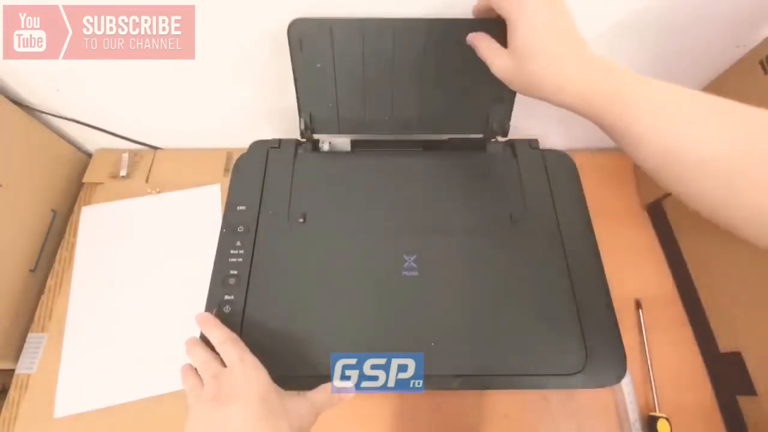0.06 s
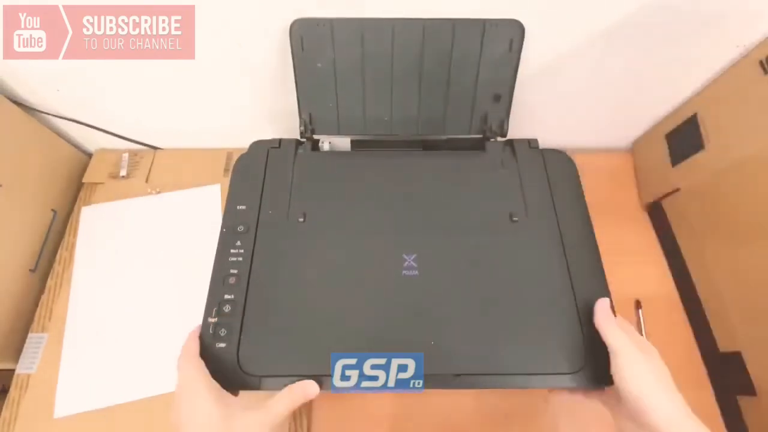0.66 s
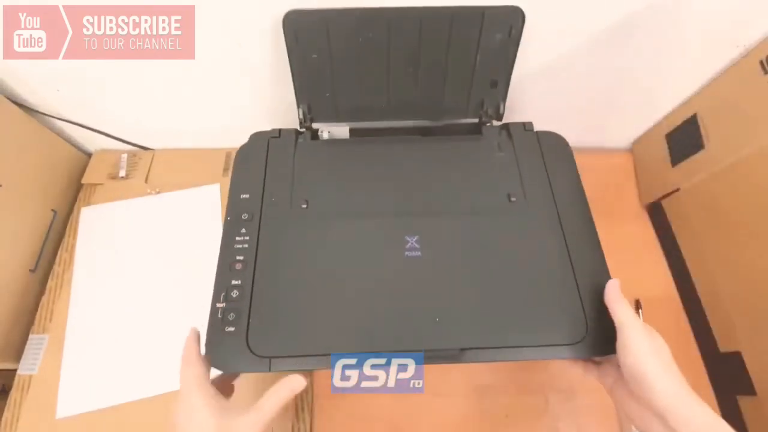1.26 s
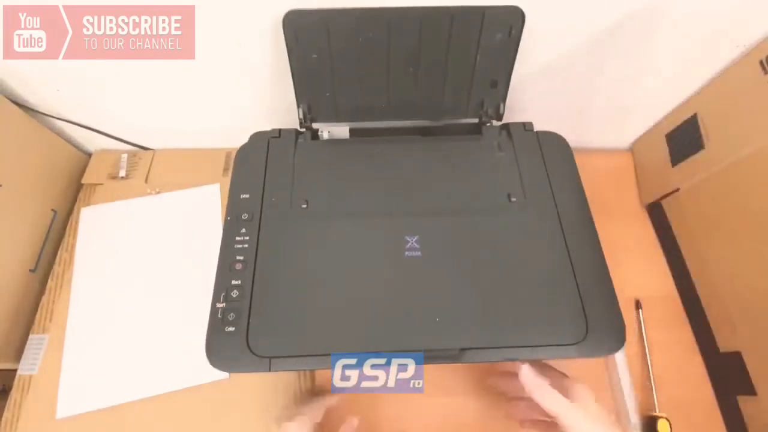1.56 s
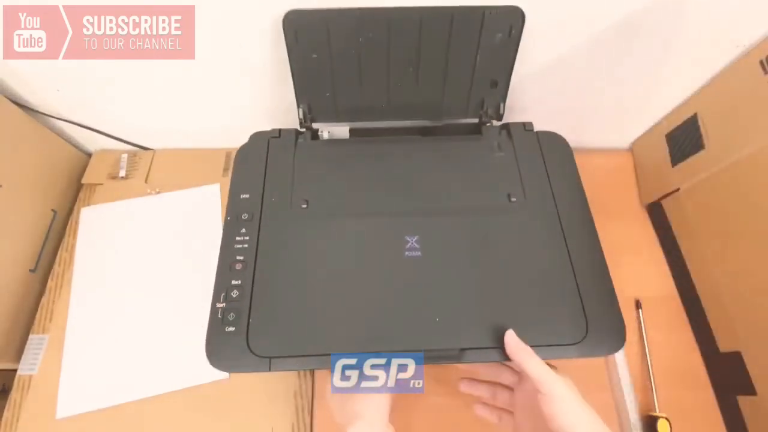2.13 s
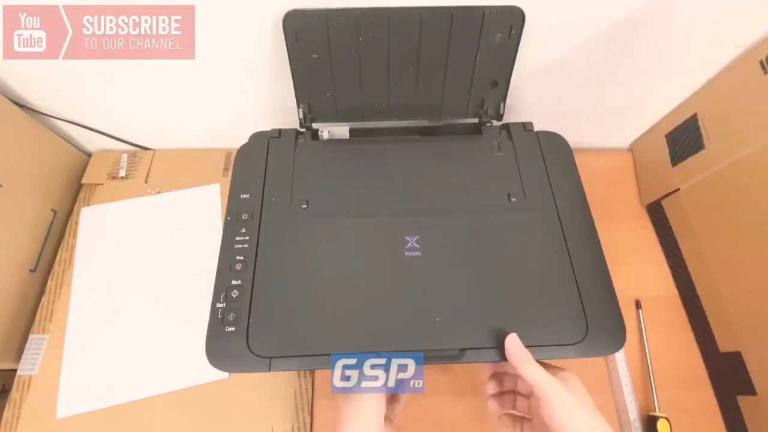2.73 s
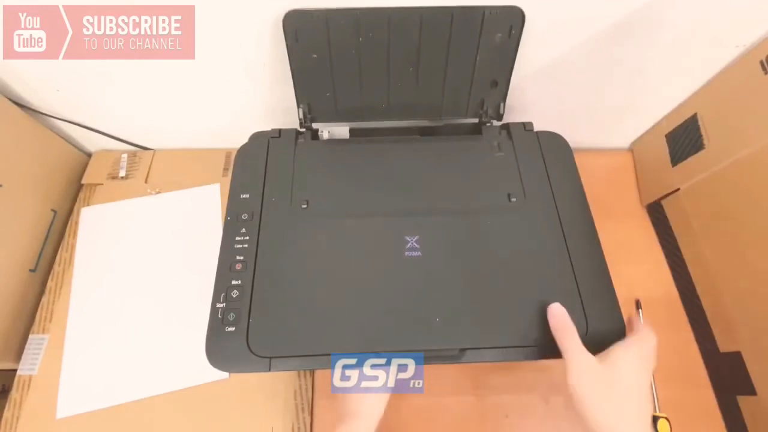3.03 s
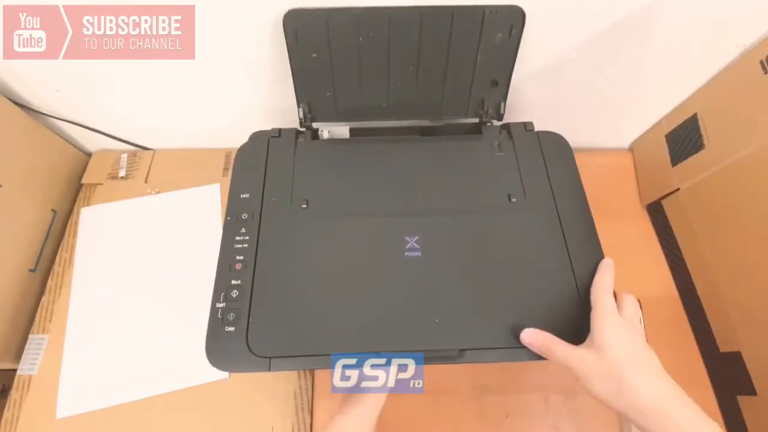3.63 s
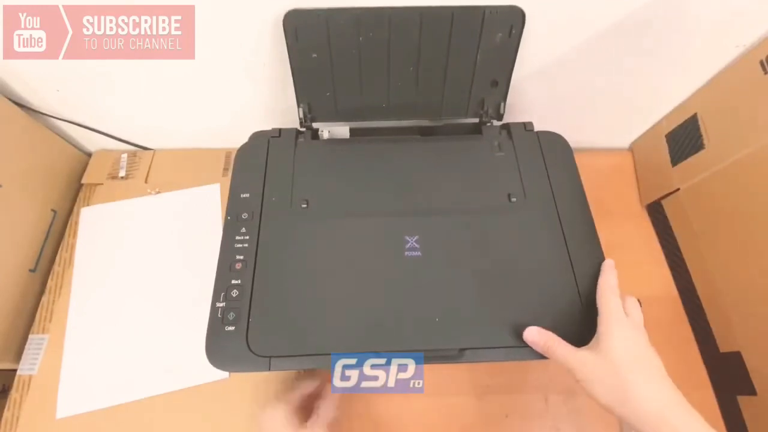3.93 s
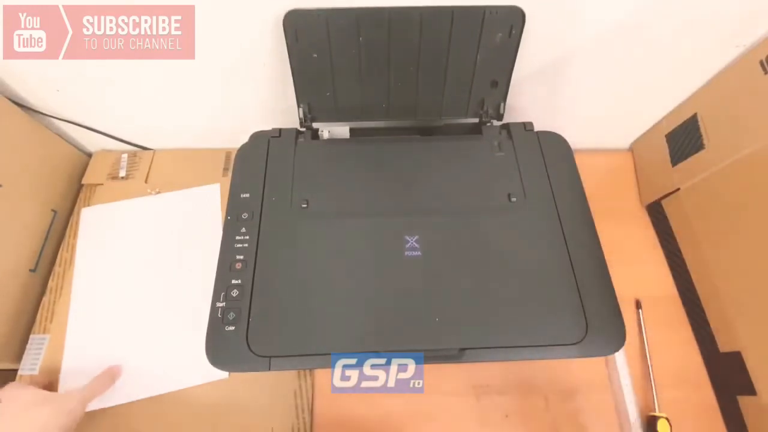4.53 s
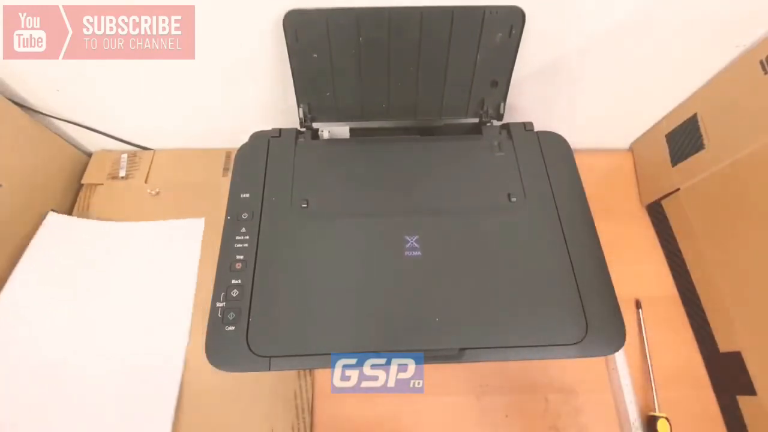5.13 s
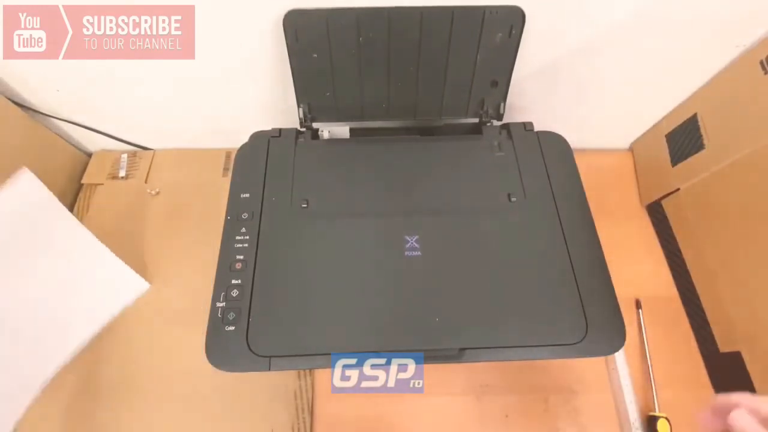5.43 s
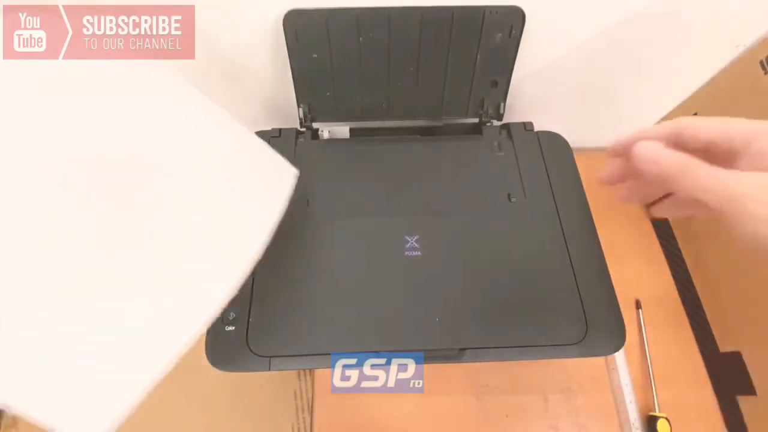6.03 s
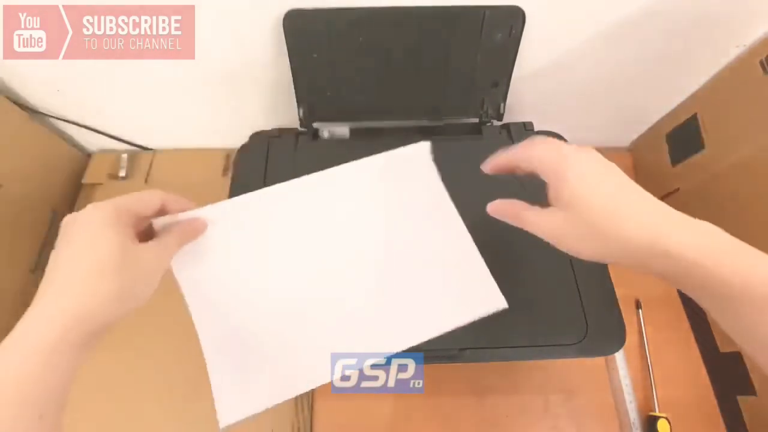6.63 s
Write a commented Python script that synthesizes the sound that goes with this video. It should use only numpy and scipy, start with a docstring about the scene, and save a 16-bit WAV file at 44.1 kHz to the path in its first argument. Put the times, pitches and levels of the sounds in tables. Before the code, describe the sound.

A plastic cover is worked onto a printer with clicks and one loud snap, then paper slides and crinkles in a quietly humming room.

```python
"""A desktop printer's plastic cover is pressed back into place by two hands: the raised rear tray
rattles, the cover scrapes and squeaks, catches tick, then it snaps home and the case thumps on the desk.
Blows are damped modes plus noise bursts; scrapes are tiny random slips. A sheet of paper slides off a
carton and swings over the printer, hissing, buckling and bending. A small room hums low behind it all."""
import sys
import numpy as np
from scipy import signal
from scipy.fft import rfft, irfft
from scipy.io import wavfile
from scipy.ndimage import uniform_filter1d

SR = 44100
rng = np.random.default_rng(int(sys.argv[2]) if len(sys.argv) > 2 else 0)


def output_pcm(signal):
    """Save a mono or channel-first signal as 16-bit PCM at the path in sys.argv[1].

    Samples are clipped to [-1, 1] before scaling.
    """
    pcm = np.clip(np.atleast_2d(signal).T, -1, 1) * 32767
    wavfile.write(sys.argv[1], SR, np.round(pcm).astype(np.int16))


N = 299439
T = np.arange(N) / SR
RING_T = T[:SR // 2]  # time axis of one blow
RING_N = len(RING_T)
SIDE_LAG_S = 0.00027  # extra travel to the far side

# spectrum of bending paper: (frequency [Hz], density [dB])
SHEET_FLEX = [(300, 2), (600, 4), (1000, 9), (1700, -0.5), (2600, -9), (5000, -49)]


def undb(db):
    """Decibels to gain."""
    return 10 ** (np.asarray(db) / 20)


def unit(x):
    """Scale to rms 1."""
    return x / np.sqrt(np.mean(x ** 2))


def add(out, time_s, sound):
    """Mix a sound in at time_s."""
    start = max(0, int(time_s * SR))
    part = sound[..., :N - start]
    out[:, start:start + part.shape[-1]] += part


def colour(x, points):
    """Filter by (frequency [Hz], gain [dB]) points."""
    hz, db = np.transpose(points)
    size = x.shape[-1]
    bins_hz = np.maximum(np.fft.rfftfreq(size, 1 / SR), 1)
    gain = undb(np.interp(np.log(bins_hz), np.log(np.maximum(hz, 1)), db))
    return irfft(rfft(x) * gain, size)


def spread(pair):
    """Two unrelated signals to stereo; long waves reach both sides alike."""
    # stereo width: (frequency [Hz], side re mid [dB])
    width = [(50, -23), (120, -6), (380, -7.5), (700, 2), (1500, 1), (16000, -0.5)]
    side = colour(pair[1], width)
    return np.array([pair[0] + side, pair[0] - side])


def from_right(x):
    """Direct sound from the right reaches the left later."""
    lag = round(SIDE_LAG_S * SR)
    return np.array([np.pad(x, (lag, 0))[:len(x)], x])


def placed(pair, bearing, direct_db, scatter_db):
    """Direct sound, near side first (bearing -1 left to 1 right), plus scatter off the cartons."""
    mid, side = (pair[0] + pair[1]) / 2, (pair[0] - pair[1]) / 2
    lag = round(min(abs(bearing), 1) * SIDE_LAG_S * SR)
    late = np.pad(mid, (lag, 0))[:len(mid)]
    direct = np.array([late, mid] if bearing > 0 else [mid, late])
    scattered = np.array([side, np.roll(side, round(0.004 * SR))])
    return undb(direct_db) * direct + undb(scatter_db) * scattered


def pan(pair, left_db):
    """Raise left over right by left_db."""
    return pair * undb(np.array([[1], [-1]]) * left_db / 2)


def noise(points, size=RING_N):
    """Coloured stereo noise, rms 1."""
    return unit(colour(spread(rng.standard_normal((2, size))), points))


def onset(rise_s):
    """A blow takes a moment to spread through the material."""
    return 1 - np.exp(-RING_T / max(rise_s, 1e-4))


def fade(t60_s):
    """Exponential decay."""
    return np.exp(-np.log(1000) * RING_T / max(t60_s, 1e-3))


def stroke(time_s, attack_s, hold_s, release_s, depth_db=20):
    """Gain that climbs depth_db over the attack, holds, and drops as far over the release."""
    full_s = time_s + attack_s
    before = (full_s - T) / max(attack_s, 1e-3)
    after = (T - full_s - hold_s) / max(release_s, 1e-3)
    return undb(-depth_db * np.maximum(before, after).clip(0, 10))


def arch(time_s, length_s):
    """Half-sine gain."""
    return np.sin(np.pi * ((T - time_s) / length_s).clip(0, 1))


def ring(modes, t60_s):
    """Struck modes, varied per blow; neighbours swing in opposition, those above 400 Hz die sooner."""
    out = 0
    for k, (hz, db) in enumerate(modes):
        jitter_db, detune, lag = rng.standard_normal(3)
        phase = 2 * np.pi * hz * (1 + 0.003 * detune) * RING_T
        decay = fade(t60_s * min(1, 400 / hz) ** 0.25)
        skew = np.array([[1], [-1]]) * np.tanh(lag) * min(hz / 1500, 1)  # short waves arrive out of step
        out = out + (-1) ** k * undb(db + jitter_db) * decay * np.sin(phase + skew)
    return out / np.sqrt(np.sum(undb(np.array(modes)[:, 1]) ** 2))


def friction(points, grain_db, smooth):
    """Tiny uneven slips, 1500 a second, each a noise burst, over a smooth hiss."""
    slips = (rng.random(N) < 1500 / SR) * undb(grain_db * rng.exponential(size=N).clip(0, 5))
    power = signal.lfilter([1], [1, -np.exp(-1 / (0.0053 * SR))], slips ** 2)
    envelope = np.sqrt(power / power.mean() + smooth ** 2)
    return unit(colour(spread(rng.standard_normal((2, N))) * envelope, points))


def background(air_db=-42, hum_db=-1):
    """Room noise and narrow humming resonances."""
    # room noise: (frequency [Hz], density [dB])
    air_spectrum = [(15, -26), (25, -29), (66, 4.5), (242, -12.5), (384, -2), (503, -18), (641, -14),
                    (840, -20), (1040, -18.5), (1330, -28), (1440, -25.5), (4030, -35.5), (11300, -41.5),
                    (13200, -55), (16000, -61)]
    # hum bands: (centre [Hz], width [Hz], level [dB])
    bands = [(46.2, 22, -46.5), (74, 9.2, -56), (102.3, 2.3, -53.5), (141.6, 27.6, -49), (173.9, 5.3, -55),
             (205.8, 1.64, -54.5), (238.2, 5.3, -59), (288.6, 27, -57), (390, 106, -60.5), (924, 16, -68.5),
             (1031, 11, -70)]
    air = undb(air_db) * noise(air_spectrum, N)
    bins_hz = np.fft.rfftfreq(N, 1 / SR)
    peaks = sum(undb(db) * np.exp(-2 * ((bins_hz - hz) / width_hz) ** 2) / np.sqrt(width_hz)
                for hz, width_hz, db in bands)
    white = spread(rng.standard_normal((2, N)))
    return air + undb(hum_db) * np.sqrt(SR / 2) * irfft(rfft(white) * peaks, N)


def drones(gain_db=-1):
    """Low gliding tones swell and fade, like engines far outside."""
    # swells: (time [s], level [dB], attack [s], hold [s], release [s], pitch after attack [Hz],
    # glide [Hz/s])
    swells = [(0, -37.5, 0.018, 0.5, 0.91, 57.6, 1.5), (1.01, -43, 0.33, 0.27, 0.2, 49, -4),
              (2.702, -42.5, 0.46, 0.13, 0.37, 63.9, 12), (3.504, -43.5, 0.24, 0.13, 0.21, 74.3, 10),
              (3.71, -42.5, 1.25, 0.22, 0.47, 130.6, 4.5), (5.505, -47.5, 0.37, 0.53, 1, 72, -13.5),
              (6.102, -44, 0.49, 0.088, .3, 130, 13.5)]
    out = 0
    for time_s, db, attack_s, hold_s, release_s, hz, glide_hz_per_s in swells:
        pitch_hz = hz + glide_hz_per_s * (T - time_s - attack_s)
        tone = np.sin(2 * np.pi * np.cumsum(pitch_hz) / SR)
        out = out + undb(gain_db + db) * stroke(time_s, attack_s, hold_s, release_s) * tone
    return np.sqrt(2) * out


def clack(edge_db, t60_s):
    """Panel modes too dense to resolve, topped by the shorter crack of the edge."""
    # dense panel modes: (frequency [Hz], density [dB])
    panel = [(200, 1), (400, 8), (650, 3.5), (800, -1.5), (1100, 2.5), (1500, -3.5), (2000, -8),
             (2900, -18), (3500, -12.5), (6000, -39)]
    # edge crack: (frequency [Hz], density [dB])
    edge = [(1500, -3.5), (2400, 0.5), (2950, 2), (3300, -2.5), (3900, -9.5), (4400, -4), (5200, -4),
            (7000, -7.5), (9000, -9), (11500, -5.5), (13000, -17), (16000, -25)]
    return noise(panel) * fade(t60_s) + undb(edge_db) * noise(edge) * fade(0.73 * t60_s)


def tray(gain_db=-3, dulling_db_per_s=80):
    """The released tray bounces in its hinges, dying down and dulling, each time on another spot."""
    # bounces: (time [s], level [dB], spot ring [dB], spot pitch [Hz])
    bounces = [(0.003, -13, -19, 430), (0.008, -22.5, 17, 398), (0.022, -16, 4, 444),
               (0.027, -18.5, 11, 950), (0.057, -17, -9, 363), (0.073, -18.5, 6, 408),
               (0.084, -18, -5, 440), (0.104, -25, 11, 393), (0.124, -24.5, -3, 365),
               (0.139, -33.5, 15.5, 409), (0.153, -33.5, 6, 278), (0.17, -47, 11, 384)]
    # tray modes: (frequency [Hz], level [dB])
    modes = [(114, -17), (144, 2), (213, -12), (289, -11), (345, -18), (455, -7), (806, -3), (875, -6),
             (962, -7), (1080, -8), (1510, 1), (1640, 2), (1880, 1), (2000, -4), (2280, -2), (2780, -6)]
    # thin tray, no hollow body: (frequency [Hz], clack gain [dB])
    thinness = [(440, 0), (570, -10.5), (780, -0.5), (1000, 1), (1300, -3), (2000, -0.5)]
    out = np.zeros((2, N))
    for time_s, db, spot_db, hz in bounces:
        spot = undb(spot_db - 0.5) * ring([(hz, 0)], t60_s=32 / hz)
        hit = colour(clack(edge_db=-3 - dulling_db_per_s * time_s, t60_s=0.098), thinness)
        body = undb(-3) * ring(modes, t60_s=0.115)
        add(out, time_s, undb(gain_db + db) * onset(rise_s=0.00055) * (hit + body + spot))
    return out


def rubs(gain_db=-3):
    """The cover scrapes grittily along its seat; fingers slide over it."""
    # strokes: (time [s], level [dB], attack [s], hold [s], release [s])
    strokes = [(0.185, -45.5, 0.098, .01, 0.19), (0.47, -54.5, 0.21, 0.082, 0.35),
               (1.286, -46.5, 0.026, 0.029, 0.064), (1.983, -46.5, 0.028, .01, 0.11),
               (2.499, -46, 0.055, .01, 0.13), (2.623, -41, 0.085, 0.078, 0.12),
               (2.876, -41, 0.11, .015, 0.15), (3.4, -39.5, 0.01, 0.064, 0.063)]
    # plastic and skin on the case: (frequency [Hz], density [dB])
    spectrum = [(300, -1), (550, 12), (800, -19), (1500, 4), (1900, -3), (2400, 0.5), (2700, -1.5),
                (3100, -5), (4000, -7), (5000, -3), (7000, -9.5), (11500, -12), (13000, -19), (16000, -20)]
    pressure = sum(undb(db) * stroke(time_s, *shape_s) for time_s, db, *shape_s in strokes)
    return undb(gain_db) * pressure * friction(spectrum, grain_db=3.5, smooth=0.3)


def touches(gain_db=2, pat_db=-10):
    """Soft skin wakes only the lowest mode of the spot it lands on, with a faint pat."""
    # hands on the case: (time [s], level [dB], pitch [Hz], pat t60 [s])
    contacts = [(0.221, -29, 1490, 0.025), (0.421, -31, 488, 0.031), (0.508, -34.5, 383, 0.1),
                (0.57, -36.5, 420, 0.084), (0.593, -38, 390, 0.29), (0.634, -36, 394, 0.13),
                (4.249, -30, 423, 0.052)]
    pat_spectrum = [(150, -35), (450, 5), (800, -4), (2500, -15.5), (10000, -27.5), (14000, -36)]
    out = np.zeros((2, N))
    for time_s, db, hz, t60_s in contacts:
        pat = undb(pat_db) * noise(pat_spectrum) * fade(t60_s)
        add(out, time_s, undb(gain_db + db) * onset(rise_s=0.00062) * (ring([(hz, 0)], t60_s) + pat))
    return out


def thumps():
    """The whole printer rocks on the desk."""
    # jolts: (time [s], level [dB])
    jolts = [(0.51, -28), (1.624, -36), (3.2686, -11.5)]
    # printer-on-desk modes: (frequency [Hz], level [dB])
    modes = [(112, -2), (128, 3.5), (163, 1.5), (197, -6.5), (245, 0.5)]
    out = np.zeros((2, N))
    for time_s, db in jolts:
        add(out, time_s, undb(db) * onset(rise_s=0.00052) * ring(modes, t60_s=0.14))
    return out


def catches(gain_db=-2):
    """Springy hooks flick past their ledges: a tick, a dry click, a short bright ring."""
    # flicks: (time [s], level [dB], hook ring [dB], click [dB])
    flicks = [(0.932, -53, -8, 4), (1.691, -36.5, -1, -2), (1.695, -30, 1, -14), (1.7971, -37, 9, 2),
              (1.801, -37.5, 11.5, 0), (1.807, -40, -3, -6), (1.955, -38.5, -10, -1),
              (2.026, -49, -13, 7.5), (2.129, -34.5, 3, -6), (2.173, -33, 6, -7.5), (2.18, -52, -8, -10),
              (2.2, -45, -10, -6), (2.423, -43, -14, 6), (2.425, -41.5, -14, 1)]
    # hook modes: (frequency [Hz], level [dB])
    hook_modes = [(2660, -8), (3020, -6), (3330, -10), (3650, -7), (4500, -13), (5750, -10)]
    # tick: (frequency [Hz], density [dB])
    tick_spectrum = [(300, 12), (560, 15.5), (800, -6), (1250, 5.5), (1800, -3), (2300, 2.5), (2950, 6),
                     (3600, 4), (4200, -7), (5500, -3.5), (6500, -8), (8500, -5), (12000, -15),
                     (16000, -14)]
    # dry click: (frequency [Hz], density [dB])
    click_spectrum = [(1500, -3), (2600, -1), (3600, -1), (4400, -4), (7000, -2), (9000, -2), (11500, -2),
                      (13000, -10), (16000, -24)]
    out = np.zeros((2, N))
    for time_s, db, hook_db, click_db in flicks:
        hook = undb(hook_db - 1) * ring(hook_modes, t60_s=0.036)
        tick = noise(tick_spectrum) * fade(t60_s=0.071)
        click = undb(click_db) * from_right(noise(click_spectrum)[0] * fade(t60_s=0.024))
        add(out, time_s, undb(gain_db + db) * onset(rise_s=0.0003) * (tick + hook + click))
    return out


def knocks(gain_db=-3):
    """The cover meets the case: each blow clacks and rings cover, struck panel and hollow case."""
    # blows: (time [s], level [dB], case ring [dB], edge [dB], clack t60 [s], panel pitch [Hz],
    # panel ring [dB], contact [s], bearing [0 ahead, 1 right])
    blows = [(1.588, -27.5, -18, 0, 0.43, 507, -18, 0.0017, 0.89),
             (1.600, -27.5, -12, -4, 0.2, 620, -22, .001, 0.95),
             (1.620, -23.5, -5, 1.5, 0.063, 505, 6, .0007, 1),
             (1.630, -30, -10, 1, 0.13, 497, -4, 0.00045, 0.88),
             (2.563, -33, -20, -11, 0.18, 554, 0.5, 0.003, 0.5),
             (2.967, -30.5, -4, -16, 0.22, 1236, -1, 0.0016, 0.96),
             (3.0128, -34.5, 10.5, 5.5, 0.047, 470, 6, 0.00035, 1),
             (3.2422, -32.5, -9, -1, 0.062, 520, -10, .0008, 0.097),
             (3.259, -25.5, 5, -20, 0.066, 356, 12, .0015, 0),
             (3.2626, -25, -2, 4, 0.067, 387, -6, 0.0028, 0),
             (3.2669, -8.5, 4.5, 3.5, 0.064, 452, -4, 0.0012, 0),
             (3.2761, -12.5, -6, 3.5, 0.037, 403, 6.5, .0007, 0.13),
             (3.288, -24, -7, -7, 0.17, 390, 9.5, 0.00089, 0.063),
             (3.405, -30, -25, 1, 0.069, 522, 7, 0.001, 0), (3.431, -36, 7, 2, 0.1, 460, -4, 0.0011, 0),
             (3.452, -36, 0, 4, 0.061, 436, -12, .0006, 0),
             (3.476, -33.5, 4, 2, 0.055, 403, -2, 0.00085, 0.038)]
    # case modes: (frequency [Hz], level [dB])
    case_modes = [(250, 0.5), (289, 4), (320, 0), (388, -3), (450, -3), (544, 1.5), (634, -1.5),
                  (1015, -26), (1140, -16), (1395, -22)]
    # cover modes: (frequency [Hz], level [dB])
    cover_modes = [(1828, 5.5), (1920, -1), (2070, -10), (2235, -11), (2408, 1.5), (2610, 2), (2675, -1),
                   (2815, -2), (5250, -4), (6450, -11), (7660, -4)]
    out = np.zeros((2, N))
    for time_s, db, case_db, edge_db, t60_s, panel_hz, panel_db, contact_s, bearing in blows:
        case = undb(case_db + 2) * ring(case_modes, t60_s=0.125)
        panel = undb(panel_db + 1) * ring([(panel_hz, 0), (panel_hz * 2.65, -9)], t60_s=0.076)
        cover = undb(-6) * ring(cover_modes, t60_s=0.09)
        blow = onset(contact_s) * (clack(edge_db, t60_s) + cover + case + panel)
        add(out, time_s, undb(gain_db + db) * placed(blow, bearing, direct_db=-0.5, scatter_db=-2))
    return out


def squeaks(waver_hz=95):
    """The dragged cover sticks and slips at a resonance; uneven grip shakes pitch and level."""
    # squeaks: (time [s], level [dB], length [s], pitch [Hz])
    slips = [(2.674, -58, 0.062, 3400), (2.68, -50, 0.055, 2640), (2.714, -49, 0.045, 2400),
             (2.76, -53, 0.071, 3790), (2.801, -46, 0.03, 1530), (2.975, -51, 0.074, 3190)]
    waver, grip = unit(uniform_filter1d(rng.standard_normal((2, N)), size=110))
    tones = 0
    for time_s, db, length_s, hz in slips:
        phase = 2 * np.pi * np.cumsum(hz + waver_hz * waver) / SR
        tones = tones + undb(db) * arch(time_s, length_s) * np.sin(phase)
    return from_right(tones * (1 + grip / 2))


def shimmer(x, depth_db, rate_hz=18, bands=18):
    """As the sheet changes shape, each band wavers in level on its own."""
    log_hz = np.log(np.maximum(np.fft.rfftfreq(N, 1 / SR), 1))
    log_centres = np.log(np.geomspace(1500, 12000, bands))
    spectrum, out = rfft(x), 0
    for share, levels in zip(np.eye(bands), rng.standard_normal((bands, 512))):
        band = irfft(spectrum * np.interp(log_hz, log_centres, share), N)
        waver = np.interp(T * rate_hz, np.arange(len(levels)), levels)
        out = out + band * undb(depth_db * waver)
    return unit(out)


def slides(hiss_gain_db=1.5):
    """The sheet hisses over the ribbed carton, then through the fingers; bearing on the carton rasps."""
    # pulls: (time [s], hiss [dB], rasp [dB], attack [s], hold [s], release [s])
    pulls = [(4.341, -49.5, -56, 0.038, 0.017, 0.22), (4.515, -55, -54, 0.1, 0.017, 0.43),
             (4.852, -73, -63, 0.072, 0.24, 1), (5.061, -47, -55, 0.084, 0.091, 0.073),
             (5.932, -42, -68, 0.046, 0.16, 0.067), (6.157, -61, -65, 0.041, 0.05, 0.18),
             (6.304, -58, -62.5, 0.097, 0.68, 0.16), (6.525, -52.5, -62, 0.079, 0.032, 0.029)]
    # paper hiss: (frequency [Hz], density [dB])
    hiss_spectrum = [(900, -13), (2000, -0.5), (3600, -3), (5600, 2.5), (7500, -2.5), (9300, -2.5),
                     (11500, -2), (13000, -10.5), (16000, -11)]
    # carton rasp: (frequency [Hz], density [dB])
    rasp_spectrum = [(1500, -37), (2400, 1.5), (3100, 0.5), (3900, 1.5), (4800, 0.5), (7000, -22)]
    hiss = shimmer(friction(hiss_spectrum, grain_db=3.3, smooth=0.4), depth_db=1.1)
    rasp = friction(rasp_spectrum, grain_db=5.5, smooth=0.54)
    return sum(stroke(time_s, *shape_s) * (undb(hiss_gain_db + hiss_db) * hiss + undb(rasp_db) * rasp)
               for time_s, hiss_db, rasp_db, *shape_s in pulls)


def crinkles():
    """A kink pops through with a crisp snap and a tick pitched by its size; the sheet around it flaps."""
    # buckles: (time [s], level [dB], flap [dB], kink pitch [Hz], kink ring [dB])
    buckles = [(4.383, -34, -13, 4100, 2), (4.424, -45, 7, 4000, 0), (4.4877, -27.5, -17, 4860, -13),
               (4.546, -29.5, -37, 6200, -4), (4.994, -48.5, -6, 3780, 6), (5.084, -49, 2, 3060, 4),
               (5.318, -53, 19, 1940, 5), (5.659, -47, -4, 2240, 6.5), (5.9334, -22, -13, 5010, 1.5),
               (5.9673, -39, 7, 3000, 6), (6.427, -46.5, 13.5, 1090, 7), (6.6563, -40.5, -2, 2640, 2)]
    # paper snap: (frequency [Hz], density [dB])
    snap_spectrum = [(1500, -14), (3800, -1), (4600, -7), (5400, 10), (6200, 0), (7100, 7), (8800, -1.5),
                     (11000, 5.5), (13000, -17), (16000, -16)]
    out = np.zeros((2, N))
    for time_s, db, flap_db, hz, kink_db in buckles:
        peak = [(hz / 2, -40), (hz / 1.14, -19), (hz, 0), (hz * 1.14, -19), (hz * 2, -40)]
        kink = undb(kink_db - 5) * noise(peak) * fade(t60_s=0.024)
        snap = undb(-5) * noise(snap_spectrum) * fade(t60_s=0.021)
        flap = undb(flap_db - 4) * noise(SHEET_FLEX) * fade(t60_s=0.064)
        add(out, time_s, undb(db) * onset(rise_s=0.0001) * (snap + kink + flap))
    return out


def flexes(gain_db=-1):
    """Each bend of the sheet gives a dull flutter."""
    # bends: (time [s], level [dB], length [s])
    bends = [(4.397, -55, .08), (5.092, -50.5, 0.2), (5.28, -49, 0.15), (5.614, -49, 0.12),
             (5.942, -45, 0.083), (6.154, -39, 0.097), (6.71, -51.5, 0.15)]
    bending = sum(undb(db) * arch(time_s, length_s) for time_s, db, length_s in bends)
    return undb(gain_db) * bending * friction(SHEET_FLEX, grain_db=4.5, smooth=0.8)


def desk_balance(pair):
    """The desk favours one side or the other, depending on frequency."""
    # balance: (frequency [Hz], left over right [dB])
    balance = [(200, 0), (390, -4.5), (560, 3.5), (1300, 0.5), (4400, 2.5), (8000, 0)]
    left = colour(pair[0], [(hz, db / 2) for hz, db in balance])
    right = colour(pair[1], [(hz, -db / 2) for hz, db in balance])
    return np.array([left, right])


def room(dry, early_db=-8.5, tail_db=-13.5, gap_s=0.0035):
    """Quick bright echoes off desk, cartons and wall, then the room's short tail."""
    def echoes(points, t60_s):
        response = noise(points) * fade(t60_s) * (RING_T > gap_s)
        return response / np.sqrt(np.sum(response ** 2) / 2)
    early = echoes([(400, -18.5), (1500, 8), (6000, 2.5), (16000, -4)], t60_s=0.053)
    tail = echoes([(80, -2), (400, 6), (1500, 4), (6000, 9.5), (16000, -5)], t60_s=0.34)
    return dry + signal.fftconvolve(dry, undb(early_db) * early + undb(tail_db) * tail, axes=1)[:, :N]


def scene():
    """Printer ahead, handled at its right side; paper to the left."""
    sliding = placed(slides() + flexes(), bearing=-1, direct_db=0.5, scatter_db=-0.5)
    sheet = pan(sliding, left_db=2) + pan(crinkles(), left_db=6)
    handling = placed(tray() + touches() + rubs(), bearing=0.97, direct_db=0, scatter_db=0.5)
    printer = desk_balance(knocks() + thumps() + handling + catches() + squeaks())
    return room(printer + sheet) + background() + drones()


def record(dry):
    """Rumble cut, soft peak limit, 16 kHz low-pass."""
    trimmed = colour(dry, [(25, -34), (36, -12), (47, -0.5)])
    limited = 1.3 * np.tanh(trimmed / 1.3)
    return signal.sosfilt(signal.ellip(8, 0.2, 70, 16000, fs=SR, output="sos"), limited)


dry = scene()
out = record(dry)
output_pcm(out)
```